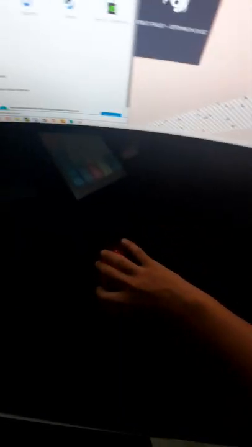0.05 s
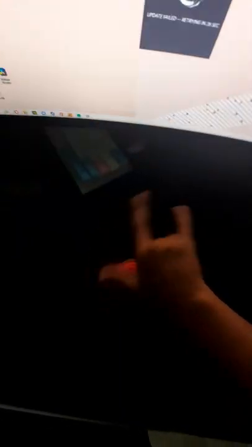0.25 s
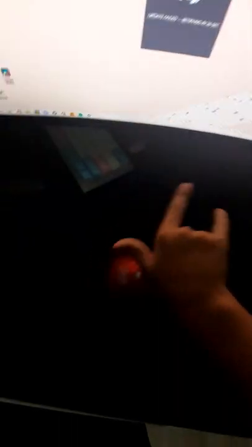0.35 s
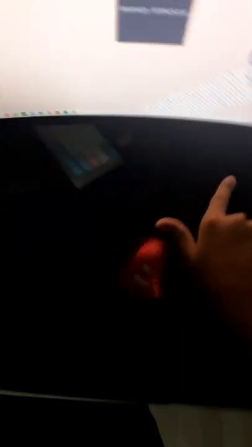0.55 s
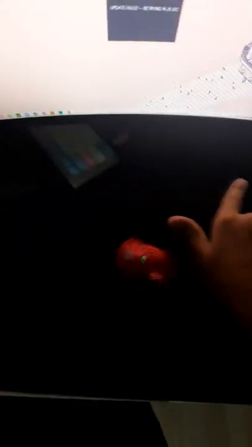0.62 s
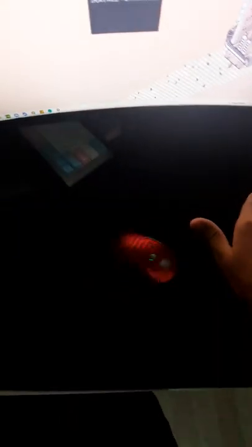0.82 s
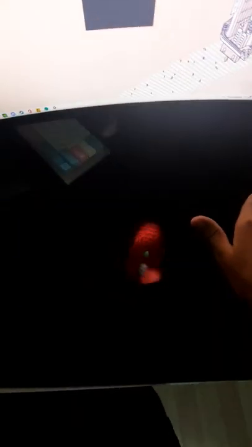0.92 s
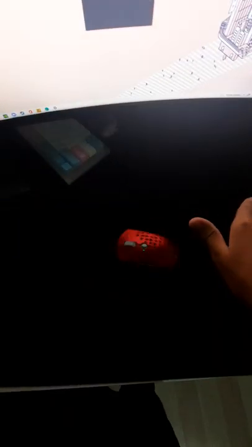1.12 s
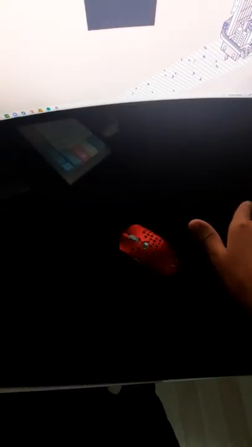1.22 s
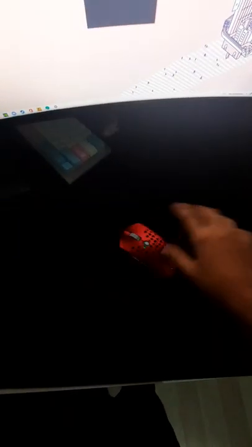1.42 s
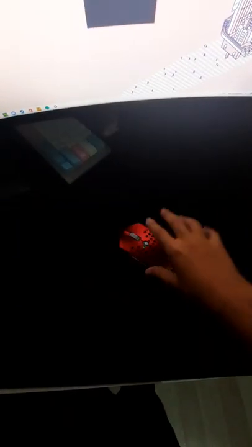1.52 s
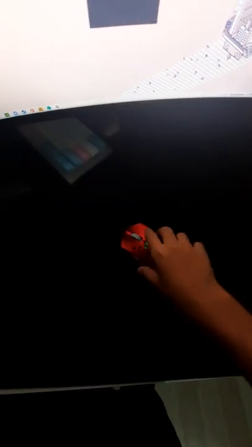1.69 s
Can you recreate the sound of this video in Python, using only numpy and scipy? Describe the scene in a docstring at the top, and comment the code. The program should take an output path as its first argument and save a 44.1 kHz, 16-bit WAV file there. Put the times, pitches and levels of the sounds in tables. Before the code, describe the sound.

A plastic computer mouse is flicked across a desk: two light fingernail ticks, then one sharp knock with a low boom from the desktop. The mouse spins over a cloth mat with a faint, fading hiss in a quiet room.

```python
"""A noise dies away in a quiet small room, leaving a low steady rush and later a faint hum.
A hand brushes a plastic mouse, ticks its hollow shell twice with a fingernail and flicks it:
one knock that sets the desk's modes booming. The mouse spins away over a cloth mat with soft bumps
and a faint hiss that swells with the turns and dies as it slows."""
import sys
import numpy as np
from scipy import signal
from scipy.fft import rfft, irfft, next_fast_len
from scipy.io import wavfile
from scipy.ndimage import uniform_filter1d

SR = 44100
rng = np.random.default_rng(int(sys.argv[2]) if len(sys.argv) > 2 else 0)


def to_wav(sig):
    """Store sig (one row per channel, or 1-D mono) as 16-bit WAV at the path in sys.argv[1].

    Samples outside -1..1 are clipped; the rate is SR.
    """
    pcm = np.clip(np.atleast_2d(sig), -1, 1) * 32767
    pcm = np.round(pcm).astype(np.int16)
    wavfile.write(sys.argv[1], SR, pcm.T)  # frames by channels


N = 77175
T = np.arange(N) / SR


def amp(db):
    return 10 ** (np.asarray(db) / 20)


def unit_rms(x):
    return x / np.sqrt(np.mean(x ** 2) + 1e-20)


def curve(points, hz):
    """Interpolate (freq_hz, value) points on a log frequency axis."""
    freqs, values = np.transpose(points)
    return np.interp(np.log(hz + 1), np.log(freqs + 1), values)


def envelope(points):
    """Gain through (time_s, level_db) points."""
    return amp(np.interp(T, *np.transpose(points)))


def humps(rows):
    """Gain of Gaussian swells."""
    return sum(amp(db) * np.exp(-((T - s) / sigma_s) ** 2 / 2) for s, db, sigma_s in rows)


def since(start_s):
    return np.maximum(T - start_s, 0)


def rise(start_s, attack_s):
    return 1 - np.exp(-since(start_s) / attack_s)


def decay(hold_until_s, t60_s):
    return np.exp(-np.log(1000) * since(hold_until_s) / t60_s)


def ring(modes, start_s):
    """Struck modes, neighbours swinging in opposite directions."""
    return sum((-1) ** (k + 1) * amp(db) * decay(start_s, t60_s) * np.sin(2 * np.pi * hz * since(start_s))
               for k, (hz, db, t60_s) in enumerate(modes))


def filtered(x, response):
    """Apply response(hz) to the spectrum of x."""
    size = next_fast_len(N + SR // 2)
    hz = np.fft.rfftfreq(size, 1 / SR)
    return irfft(rfft(x, size) * response(hz), size)[..., :N]


# left-right likeness in the room: freq_hz, correlation
ROOM_COHERENCE = [(50, .65), (180, 1), (550, 0.35), (1600, 0.037), (15000, 0.074)]
# left-right likeness of the desk: freq_hz, correlation
DESK_COHERENCE = [(100, 1), (300, .3), (600, 0.11), (1500, .3)]
def noise(spectrum, coherence=ROOM_COHERENCE):
    """Coloured stereo noise of rms 1."""
    def mid_side_gains(hz):
        angle = np.arccos(np.clip(curve(coherence, hz), -1, 1)) / 2
        return amp(curve(spectrum, hz)) * [np.cos(angle), np.sin(angle)]
    mid, side = filtered(rng.standard_normal((2, N)), mid_side_gains)
    return unit_rms(np.array([mid + side, mid - side]))


# dying noise spectrum: freq_hz, gain_db
FADING_SPECTRUM = [(25, -3), (50, -0.5), (290, 0), (420, -5.5), (900, -6), (1400, -10), (2400, -4.5),
                   (3500, -16.5), (6000, -26), (8500, -38), (15000, -46.5)]
FADING_DB, FADING_T60_S = -45.5, 0.35
def fading_noise():
    """The tail of an earlier noise dies away."""
    return amp(FADING_DB) * noise(FADING_SPECTRUM) * decay(0, FADING_T60_S)


# room rush spectrum: freq_hz, gain_db
RUSH_SPECTRUM = [(20, -26.5), (50, -7.5), (75, -12), (100, -8.5), (130, -9.5), (185, -9), (220, -18.5),
                 (270, -3), (330, -5), (380, -11.5), (450, -2.5), (600, -10), (850, -17), (1500, -27),
                 (3000, -34.5), (5000, -38), (10000, -40), (15500, -35)]
# room rush envelope: time_s, level_db
RUSH_ENVELOPE = [(0, -63), (1.1, -67.5), (1.75, -67.5)]
# swell spectrum: freq_hz, gain_db
SWELL_SPECTRUM = [(200, -22.5), (300, -11), (450, 5), (600, -3), (900, -30), (3000, -44)]
# brief swells of the rush: peak_s, level_db, sigma_s
RUSH_SWELLS = [(.53, -65.5, 0.033), (.65, -71, 0.026), (1.15, -66, 0.022), (1.28, -69, 0.024),
               (1.485, -69, 0.02)]
def rush():
    """The room's low rush, with a few brief swells."""
    steady = noise(RUSH_SPECTRUM) * envelope(RUSH_ENVELOPE)
    return steady + noise(SWELL_SPECTRUM) * humps(RUSH_SWELLS)


# cloth friction envelope: time_s, level_db
GLIDE_ENVELOPE = [(.12, -103), (.148, -67.5), (.205, -57.5), (.232, -59.5), (.25, -51.5), (.3, -65),
                  (.39, -63), (.435, -64), (.463, -73), (.53, -65.5), (.618, -72), (.705, -69),
                  (.738, -77.5), (.765, -73), (.87, -70.5), (1.0, -76), (1.17, -83), (1.3, -105)]
# hiss at speed: freq_hz, gain_db
FAST_SPECTRUM = [(500, -29.5), (2500, -19), (4500, -5.5), (6000, -0.5), (8000, -1), (12000, 2),
                 (15500, -4.5)]
# hiss once slowed: freq_hz, gain_db
SLOW_SPECTRUM = [(500, -14), (4000, -18.5), (7000, -9), (9000, -4), (12000, -0.5), (15500, -7.5)]
SLOWING_START_S, SLOWING_END_S = 0.38, 0.81
def glide():
    """The mouse's feet hiss over the weave, thinner as it slows."""
    slowed = np.interp(T, (SLOWING_START_S, SLOWING_END_S), (0, 1))
    hiss = np.sqrt(1 - slowed) * noise(FAST_SPECTRUM) + np.sqrt(slowed) * noise(SLOW_SPECTRUM)
    return hiss * envelope(GLIDE_ENVELOPE)


GRAIN_RMS_DB, CLOTH_LEFT_DB = 0.8, 0.5
def cloth_grain(friction):
    """A fine flicker in the friction's level; the sound sits slightly left."""
    flicker = unit_rms(uniform_filter1d(rng.standard_normal(N), size=120))
    pan = amp(np.array([[CLOTH_LEFT_DB], [-CLOTH_LEFT_DB]]) / 2)
    return friction * amp(GRAIN_RMS_DB * flicker) * pan


# skin friction spectrum: freq_hz, gain_db
SKIN_SPECTRUM = [(500, -12.5), (1500, -11.5), (2700, -4), (3400, -20), (8000, -24.5)]
# brush envelope: time_s, level_db
BRUSH_ENVELOPE = [(.125, -88), (.15, -67), (.19, -73), (.22, -62), (.25, -100)]
def hand_brush():
    """Skin brushes the shell just before the flick."""
    return noise(SKIN_SPECTRUM) * envelope(BRUSH_ENVELOPE)


# bump spectrum: freq_hz, gain_db
BUMP_SPECTRUM = [(30, -30), (80, -16), (115, 2.5), (165, -3), (220, -15.5), (450, -10.5), (900, -27.5),
                 (3000, -70)]
# bumps on the mat: peak_s, level_db, sigma_s
MAT_BUMPS = [(0.163, -57.5, 0.013), (.216, -53.5, 0.023), (.492, -54.5, 0.017), (.57, -70, 0.022),
             (.66, -67, 0.044), (0.945, -64.5, 0.044), (1.025, -69, 0.029)]
def bumps():
    """Soft pressure from the hand and the rocking mouse murmurs in the desk."""
    return noise(BUMP_SPECTRUM, DESK_COHERENCE) * humps(MAT_BUMPS)


def chatter(hits, spectrum, t60_s):
    """Hard contacts: noise bursts held a few milliseconds, then dying fast."""
    bursts = sum(amp(db) * rise(s, attack_s=0.0002) * decay(s + hold_s, t60_s) for s, db, hold_s in hits)
    return noise(spectrum) * bursts


# fingernail contacts: start_s, level_db, hold_s
NAIL_HITS = [(0.195, -36.5, .0011), (0.2029, -35.5, 0.0026)]
# tick spectrum: freq_hz, gain_db
TICK_SPECTRUM = [(800, -32.5), (1400, -27), (2000, -27.5), (4300, -15.5), (5200, -23), (6200, -14.5),
                 (10200, -15), (11600, 4.5), (13000, -11.5), (15000, -1), (16500, -9.5)]
NAIL_HZ, NAIL_GAIN_DB, NAIL_T60_S = 1672, -19.5, 0.055
def nail_ticks():
    """A fingernail ticks the shell and rings one note of it; returns (ticks, note)."""
    note = sum(amp(db) * ring([(NAIL_HZ, NAIL_GAIN_DB, NAIL_T60_S)], s) for s, db, _ in NAIL_HITS)
    return chatter(NAIL_HITS, TICK_SPECTRUM, t60_s=0.014), note


# plastic contacts on the mat: start_s, level_db, hold_s
CLACK_HITS = [(0.2362, -30.5, 0.0032), (0.2477, -48.5, .0012), (0.305, -48.5, 0.0016)]
# clack spectrum: freq_hz, gain_db
CLACK_SPECTRUM = [(300, -16), (800, -2), (1400, -10.5), (2400, -5), (3400, -5.5), (5200, -2), (6700, -7),
                  (7600, 0), (9800, -8), (11500, -0.5), (13000, -8), (14500, -6), (16500, -19)]
# shell modes: pitch_hz, gain_db, t60_s
SHELL_MODES = [(1900, -17.5, 0.23), (2385, -1, .075), (2800, -17, 0.13), (3960, -11, .056),
               (5040, -5, .026)]
SHELL_GAIN_DB = -6
def mouse_clacks():
    """The mouse clacks on the mat and its hollow shell rings; returns (clacks, shell)."""
    shell = sum(amp(db + SHELL_GAIN_DB) * ring(SHELL_MODES, s) for s, db, _ in CLACK_HITS)
    return chatter(CLACK_HITS, CLACK_SPECTRUM, t60_s=0.018), shell


KNOCK_S, SHOVE_HZ, SHOVE_DB, SHOVE_RISE_S = 0.2362, 377, -16, 0.0015
def desk_shove():
    """The knock first shoves the desk top: one short pulse."""
    age = since(KNOCK_S) / SHOVE_RISE_S
    pulse = age * np.exp(1 - age)
    return -amp(SHOVE_DB) * pulse * np.sin(2 * np.pi * SHOVE_HZ * since(KNOCK_S))


# desk modes: pitch_hz, gain_db, t60_s
DESK_MODES = [(101.2, 5.7, 0.26), (132, 10, 0.28), (168.5, 5.5, 0.44), (264.1, -2.4, 0.4), (273.1, -4, .48),
              (312, -13.5, 1), (343, -4, 0.37), (410.7, 5, .18), (422.3, -7.5, 0.31), (462.3, -8, 0.32),
              (489, 4.9, 0.15), (563, -15.5, .38), (680, -16.5, 0.14)]
# dense desk ringing: freq_hz, gain_db
DENSE_SPECTRUM = [(30, -26.5), (60, -8), (110, -4.5), (210, -3.5), (300, 6.5), (500, -4), (750, -18),
                  (1200, -23), (3000, -61.5)]
# desk balance: freq_hz, left_over_right_db
DESK_BALANCE = [(60, 1.5), (140, 3), (280, 1), (500, 0.5)]
MODES_GAIN_DB, DENSE_DB, DENSE_T60_S = -25.5, -32.5, 0.51
SETTLE_START_S, SETTLE_T60_S, LEFT_LEAD_S = 0.39, 0.31, 0.0001
def desk_boom():
    """The desk's modes build up, boom and settle under extra damping, earlier and louder on the left."""
    def placement(hz):
        log_ratio = np.log(amp(curve(DESK_BALANCE, hz))) + 2j * np.pi * hz * LEFT_LEAD_S
        return np.exp(np.outer([0.5, -0.5], log_ratio))
    modes = amp(MODES_GAIN_DB) * ring(DESK_MODES, KNOCK_S)
    dense = amp(DENSE_DB) * noise(DENSE_SPECTRUM, DESK_COHERENCE) * decay(KNOCK_S, DENSE_T60_S)
    swell = rise(KNOCK_S, attack_s=0.022) * decay(SETTLE_START_S, SETTLE_T60_S)
    return filtered(swell * (modes + dense), placement)


# catches on the weave: peak_s, level_db, sigma_s, pitch_hz
WEAVE_CATCHES = [(.34, -63.5, 0.011, 6200), (0.426, -62.5, 0.0071, 8000), (0.997, -81, 0.026, 8750)]
SCRAPE_Q = 8
def scrapes():
    """An edge of the mouse catches the weave; each catch sings briefly at its own pitch."""
    def band(pitch_hz):
        white = rng.standard_normal((2, N))
        return unit_rms(filtered(white, lambda hz: 1 / (1 + (SCRAPE_Q * (hz / pitch_hz - 1)) ** 2)))
    return sum(band(hz) * humps([(s, db, sigma_s)]) for s, db, sigma_s, hz in WEAVE_CATCHES)


# hum envelope: time_s, level_db
HUM_ENVELOPE = [(0, -94), (1.0, -82), (1.11, -74.5), (1.3, -73.5), (1.45, -83.5), (1.56, -94)]
HUM_HZ = 101
def hum():
    """A faint low hum comes and goes."""
    return np.sqrt(2) * np.sin(2 * np.pi * HUM_HZ * T) * envelope(HUM_ENVELOPE)


# room tail spectrum: freq_hz, gain_db
TAIL_SPECTRUM = [(300, -4.5), (1000, 4), (2500, -1.5), (5000, -9.5), (10000, -22), (16000, -13)]
# room tail decay: freq_hz, t60_s
TAIL_DECAY = [(500, 0.19), (2500, 0.34), (6000, 0.31), (15000, 0.62)]
REVERB_DB, TICK_SEND_DB = -3.5, -2.5
def reverb(x):
    """The small room's short diffuse tail, each band dying at its own rate."""
    hz, t, bands = signal.stft(rng.standard_normal((2, SR // 2)), SR, nperseg=256)
    colour = amp(curve(TAIL_SPECTRUM, hz))[:, None]
    fade = np.exp(-np.log(1000) * t / curve(TAIL_DECAY, hz)[:, None])
    tail = signal.istft(bands * colour * fade, SR, nperseg=256)[1]
    tail /= np.linalg.norm(tail[0])
    return amp(REVERB_DB) * signal.fftconvolve(x, tail, axes=1)[:, :N]


def scene():
    """Room, hand, mouse and desk; only the ticks and clacks feed the reverb."""
    background = fading_noise() + rush() + hum()
    handling = cloth_grain(glide() + scrapes()) + hand_brush() + bumps()
    ticks, nail_note = nail_ticks()
    clacks, shell = mouse_clacks()
    mouse = ticks + nail_note + clacks + shell + reverb(amp(TICK_SEND_DB) * ticks + clacks)
    return background + handling + mouse + desk_shove() + desk_boom()


LOW_CUT_HZ, BAND_LIMIT_HZ = 13, 16100
def record(dry):
    """The recorder thins the deep bass and keeps nothing above its band limit."""
    thinned = signal.sosfilt(signal.butter(2, LOW_CUT_HZ, "highpass", fs=SR, output="sos"), dry)
    return filtered(thinned, lambda hz: 1 / (1 + (hz / BAND_LIMIT_HZ) ** 120))


dry = scene()
out = record(dry)
to_wav(out)
```